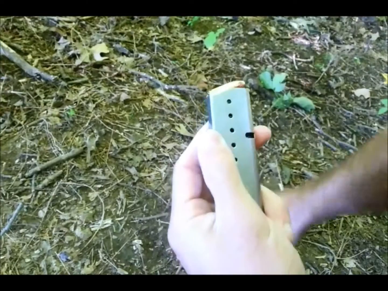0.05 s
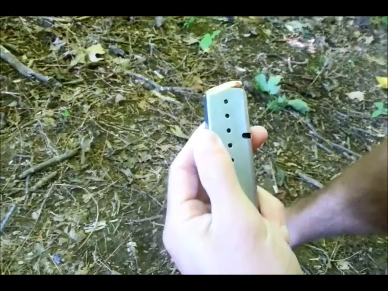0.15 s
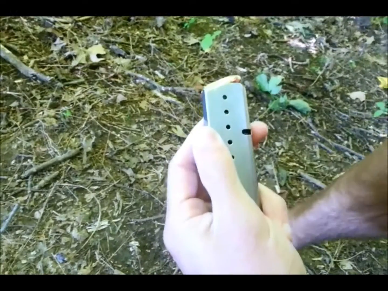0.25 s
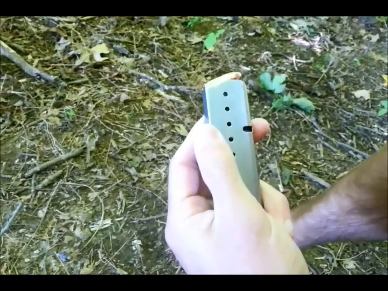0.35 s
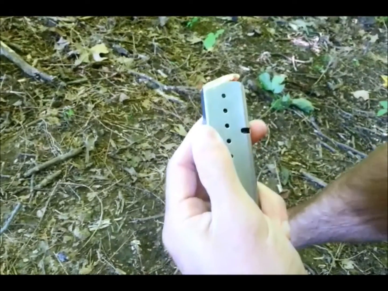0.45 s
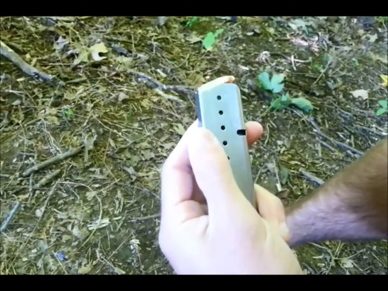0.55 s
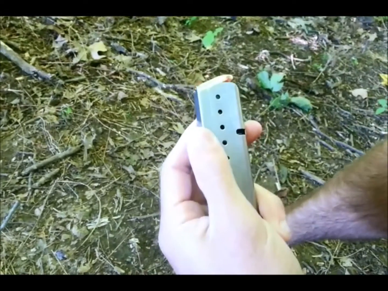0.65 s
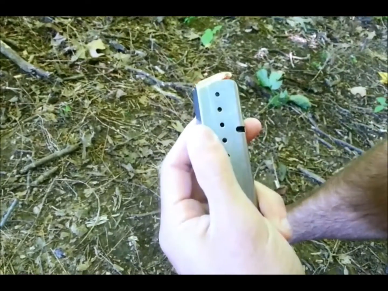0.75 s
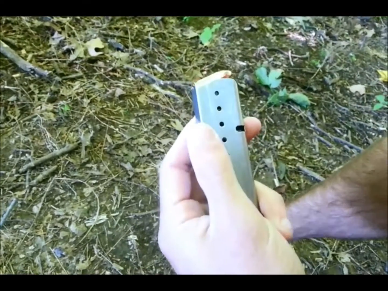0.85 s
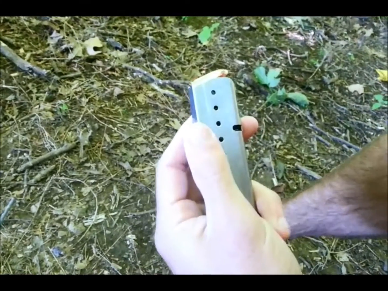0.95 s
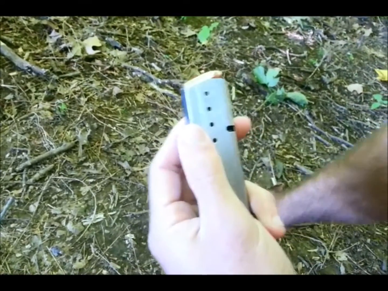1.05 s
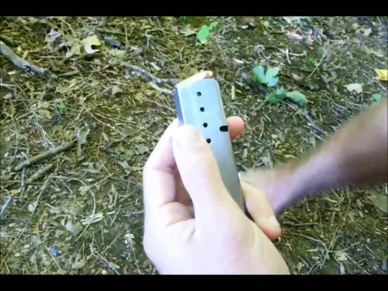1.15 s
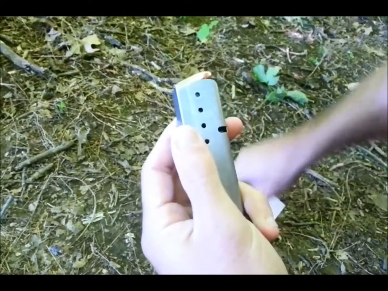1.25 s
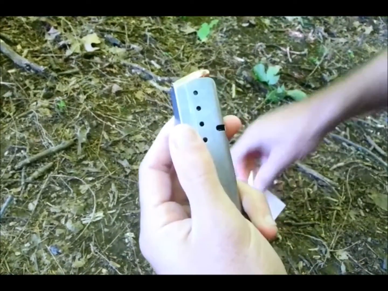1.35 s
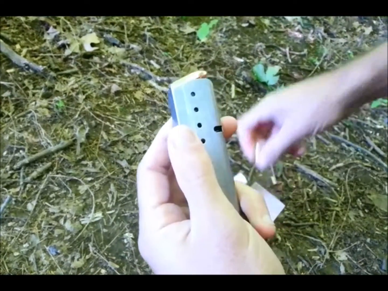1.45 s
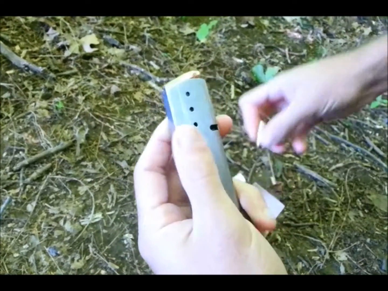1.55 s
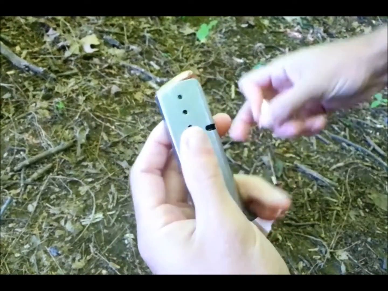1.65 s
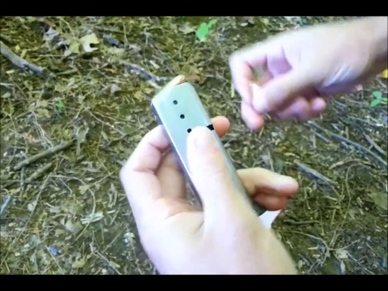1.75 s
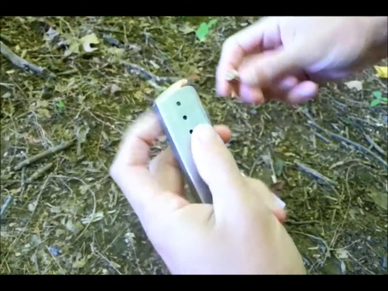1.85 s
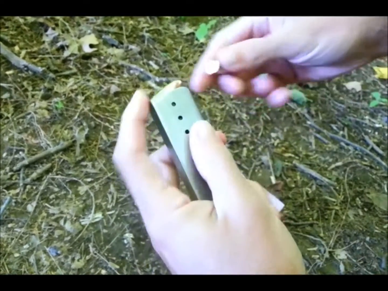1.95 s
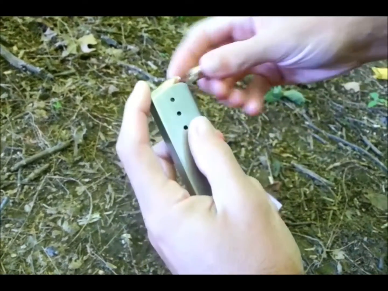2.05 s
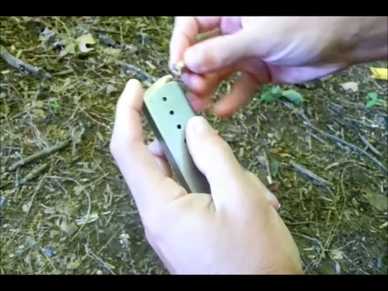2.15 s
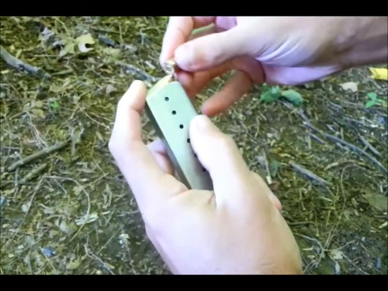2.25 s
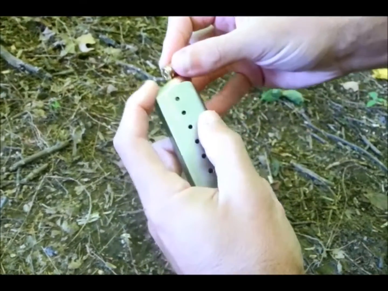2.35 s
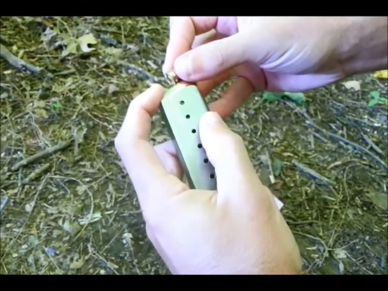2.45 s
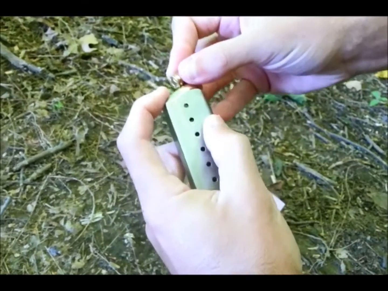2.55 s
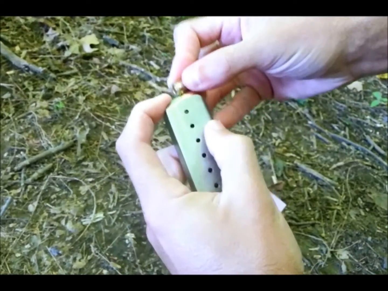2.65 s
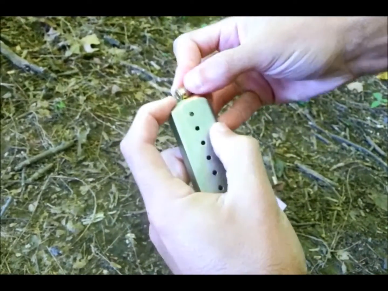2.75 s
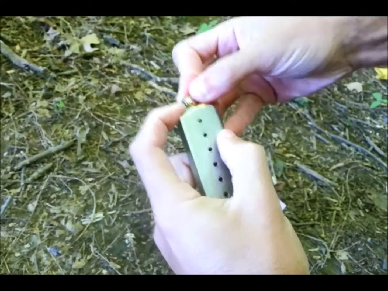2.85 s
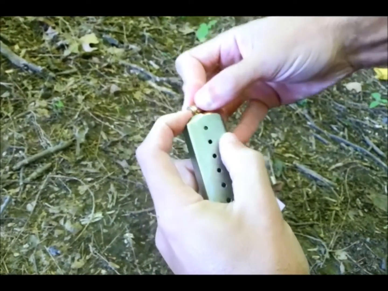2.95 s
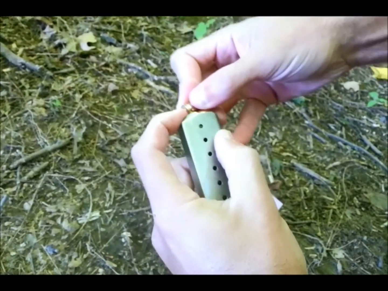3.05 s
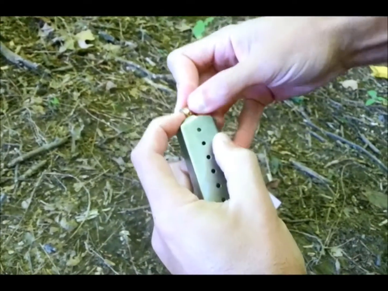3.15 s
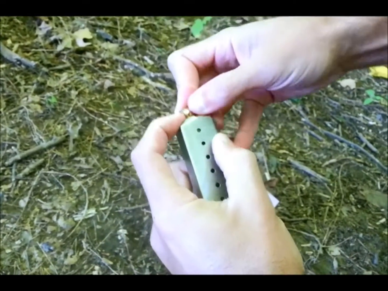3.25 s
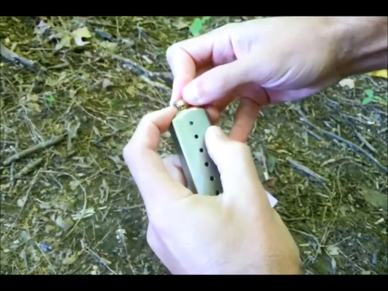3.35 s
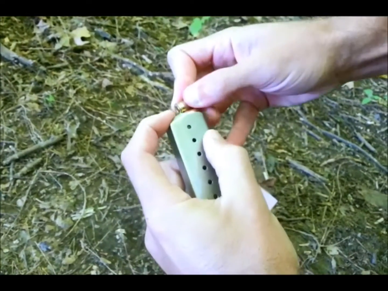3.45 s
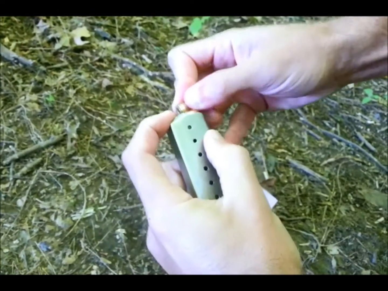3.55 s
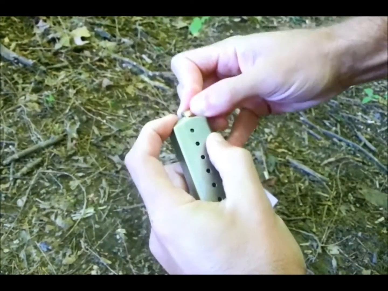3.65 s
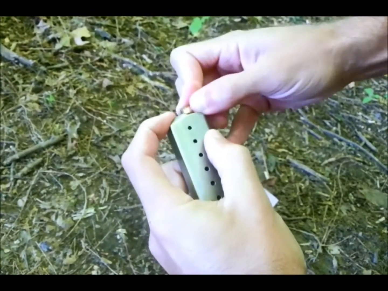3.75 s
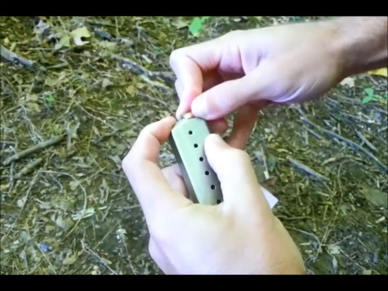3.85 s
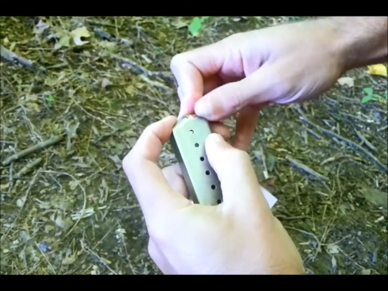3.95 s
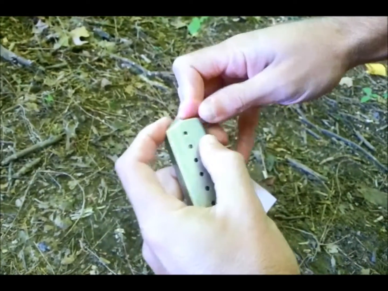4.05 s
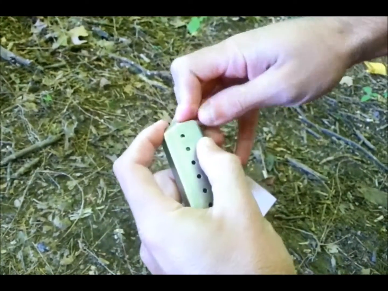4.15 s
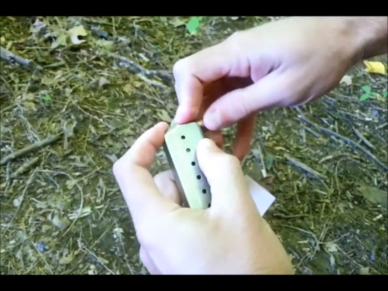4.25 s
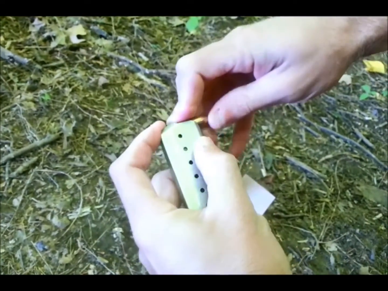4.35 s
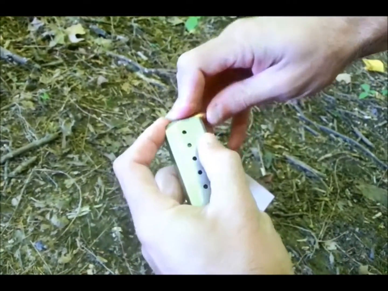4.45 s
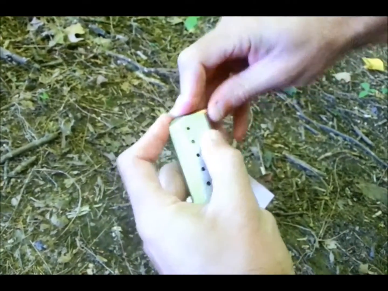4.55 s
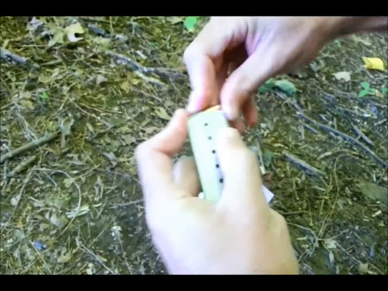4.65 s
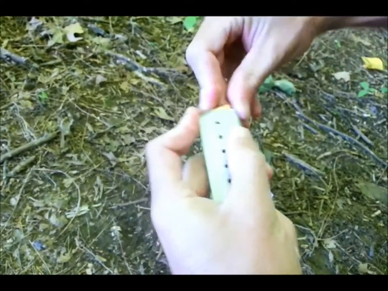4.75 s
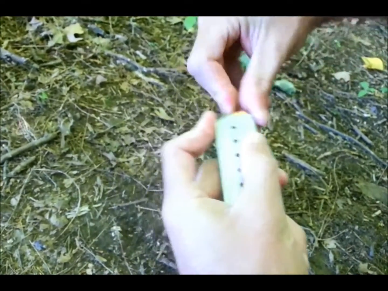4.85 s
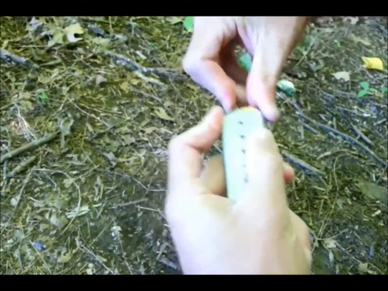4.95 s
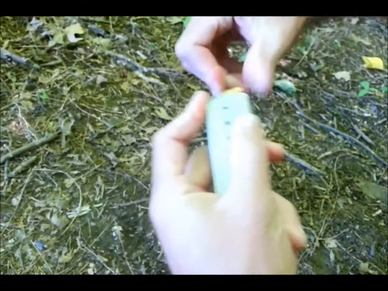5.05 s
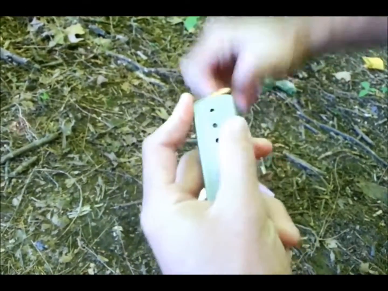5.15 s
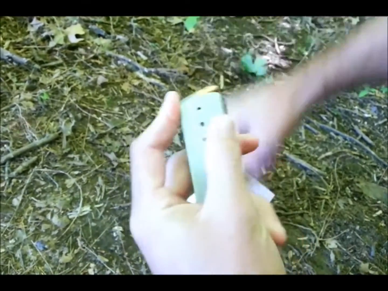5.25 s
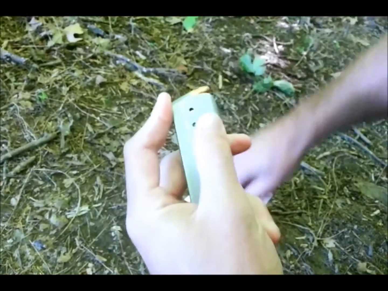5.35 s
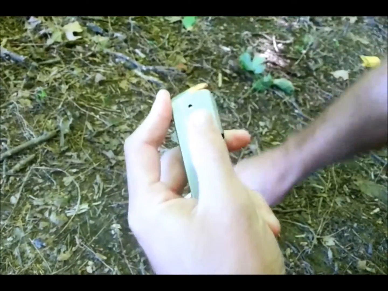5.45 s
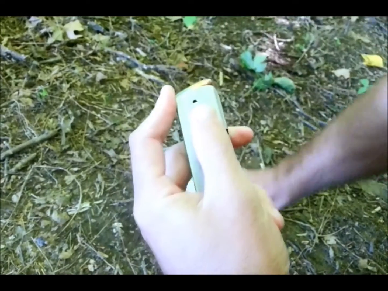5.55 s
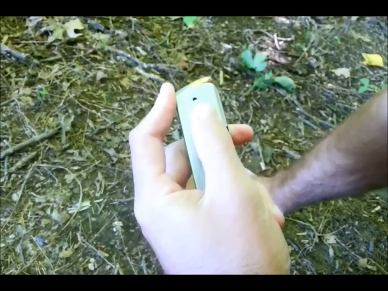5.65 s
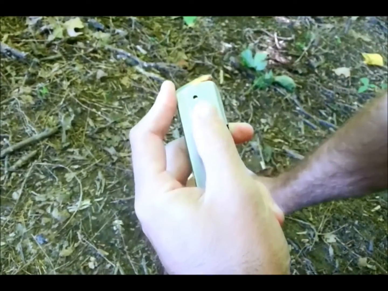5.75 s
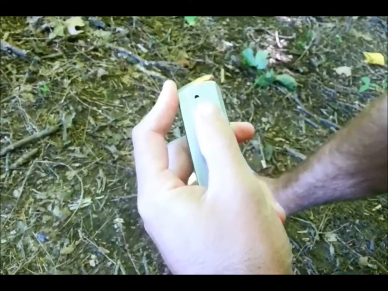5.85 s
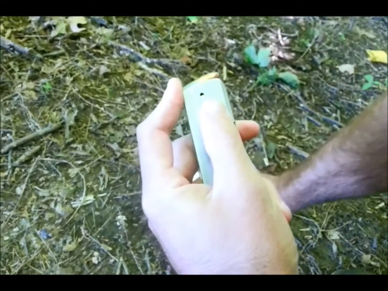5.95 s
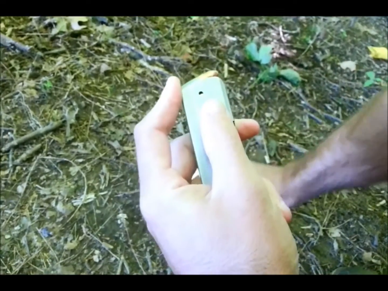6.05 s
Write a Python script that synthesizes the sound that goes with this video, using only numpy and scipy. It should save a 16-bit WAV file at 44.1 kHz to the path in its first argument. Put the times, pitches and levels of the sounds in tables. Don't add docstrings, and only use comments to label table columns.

```python
import sys
import numpy as np
from scipy import signal
from scipy.fft import rfft, irfft, next_fast_len
from scipy.io import wavfile
from scipy.ndimage import uniform_filter1d, map_coordinates

SR = 44100
rng = np.random.default_rng(int(sys.argv[2]) if len(sys.argv) > 2 else 0)


def inscribe(sig):
    pcm = np.round(np.clip(np.atleast_2d(sig).T, -1, 1) * 32767)
    wavfile.write(sys.argv[1], SR, pcm.astype(np.int16))


def volts_from_decibels(level):
    exponent = np.asarray(level, float) / 20
    return 10 ** exponent


N = 269010


def along(points, hz):
    f, v = np.transpose(points)
    return np.interp(np.log(hz + 1), np.log(f + 1), v, left=v[0], right=v[-1])


def unit(x):
    return x / np.sqrt(np.mean(x ** 2) + 1e-20)


def wobble(rate):
    knots = rng.standard_normal(int(N * rate / SR) + 4)
    return map_coordinates(knots, [np.arange(N) * rate / SR], order=1)


def filtered(x, response):
    m = next_fast_len(N + 8192)
    return irfft(rfft(x, m) * response(np.fft.rfftfreq(m, 1 / SR)), m)[..., :N]


def pair(alike):
    a, b = rng.standard_normal((2, N))
    turn = np.arccos(np.clip(alike, -1, 1)) / 2
    return np.array([np.cos(turn) * a + np.sin(turn) * b, np.cos(turn) * a - np.sin(turn) * b])


def rush(spectrum, alike, patchy_db):
    z = signal.stft(np.pad(pair(alike), ((0, 0), (0, 512))), nperseg=512)[2]
    field = uniform_filter1d(rng.standard_normal(z.shape[1:]), 6, 0)
    field = uniform_filter1d(field, 10, 1)
    patchy = signal.istft(z * volts_from_decibels(patchy_db * unit(field)), nperseg=512)[1][:, :N]
    return unit(filtered(patchy, lambda hz: volts_from_decibels(along(spectrum, hz))))


def resonant(x, modes, lag, left_db):
    def body(f):
        total = 0
        for k, (center, width, db) in enumerate(modes):
            mode = 1j * f * width / (center * center - f * f + 1j * f * width)
            total = total + (-1) ** k * volts_from_decibels(db) * mode
        return total

    def ports(f):
        delay = np.exp(-1j * np.pi * f * lag / SR * np.array([[1], [-1]]))
        return delay * volts_from_decibels([[left_db / 2], [-left_db / 2]])

    gain = np.sqrt(np.mean(np.abs(body(np.linspace(0, SR / 2, 4000))) ** 2))
    return filtered(x, lambda f: body(f) * ports(f) / gain)


def bursts(times, db, t60, rise, hz=None):
    t = np.arange(SR // 16) / SR
    decay = volts_from_decibels(db[:, None] - 60 * t / np.clip(t60, .003, .07)[:, None])
    shape = decay * (1 - np.exp(-t / rise))
    if hz is not None:
        shape = shape * np.sin(2 * np.pi * hz[:, None] * t)
    at = np.round(times * SR).astype(int)[:, None] + np.arange(len(t))
    return np.bincount(at.ravel(), shape.ravel(), N + SR)[:N]


def grains(count, spread_db, t60):
    when, size = rng.random((count, 2)).T
    hits = np.bincount((when * N).astype(int), volts_from_decibels(-spread_db * np.log(size + 0.0059)), N)
    return unit(signal.lfilter([1], [1, -volts_from_decibels(-60 / (t60 * SR))], hits) + .2)


def strokes(rows, rise, fall):
    t = np.arange(N) / SR
    gain = 0
    for s, hold, db in rows:
        gain = gain + volts_from_decibels(db - rise * np.clip(s - t, 0, 1) - fall * np.clip(t - s - hold, 0, 1))
    return gain


# (pitch_hz, level_db per Hz)
RUMBLE_COLOUR = [(15, -55), (30, -35), (66, -13), (120, -5), (250, -2), (500, -5), (900, -8.5), (1500, -14),
                 (2200, -26), (3500, -120)]


def far_rumble():
    return volts_from_decibels(-58 + 0.33 * wobble(3.48)) * rush(RUMBLE_COLOUR, alike=0.13, patchy_db=-0.4)


# (time_s, level_db)
BREEZE = [(0, -53), (1.2, -53.5), (1.6, -56.5), (2.2, -56), (3.6, -53.5), (4.4, -52.5), (5.1, -51.5),
          (5.5, -50.5), (6.1, -49)]
# (pitch_hz, level_db per Hz)
LEAF_COLOUR = [(710, -14), (1200, -13), (1440, -8.5), (1570, -12.5), (2420, -4), (2800, -2.5), (3630, 1.5),
               (4580, -1), (5610, -8), (7130, -12), (12000, -27), (15600, -51), (22000, -120)]


def leaves():
    breeze = volts_from_decibels(np.interp(np.arange(N) / SR, *np.transpose(BREEZE), right=-120))
    flutter = volts_from_decibels(3.0 + 0.31 * wobble(4.9))
    return breeze * flutter * rush(LEAF_COLOUR, alike=-0.061, patchy_db=1.24) * volts_from_decibels([[-1.5], [1.5]])


# (start_s, length_s, from_hz, to_hz, level_db)
BIRD_LISPS = [
    (2.72, 0.09, 8100, 7900, -66),
    (5.14, .09, 8700, 8400, -70),
    (5.248, .09, 8000, 8050, -61),
    (5.353, 0.076, 7060, 7140, -59),
    (5.418, .06, 6000, 5800, -59),
]


def far_bird():
    bird, blur_hz = np.zeros(N), 220 * wobble(302)
    for s, length, from_hz, to_hz, db in BIRD_LISPS:
        u = np.linspace(0, 1, round(length * SR))
        hz = from_hz + (to_hz - from_hz) * u + blur_hz[:len(u)]
        lisp = np.sin(np.pi * u) * np.sin(2 * np.pi * np.cumsum(hz) / SR)
        bird[round(s * SR):][:len(u)] += volts_from_decibels(db) * lisp
    return bird * volts_from_decibels(4 * wobble(120))


# (pitch_hz, t60_s)
TREE_DECAY = [(500, 0.17), (3000, 0.53), (4500, 0.25), (7000, 0.34), (12000, 0.34)]
# (pitch_hz, level_db)
ECHO_COLOUR = [(800, -30), (2000, -17), (2800, -5), (3300, 1.5), (4200, 2.5), (5200, -2), (6500, -12),
               (10000, -14.5), (14000, -20)]


def trees(near):
    blows = np.abs(near) * rng.standard_normal(N)
    hz, t, z = signal.stft(rng.standard_normal((2, SR // 2)), SR, nperseg=256)
    fade = volts_from_decibels(-60 * t / along(TREE_DECAY, hz)[:, None])
    swell = 1 - np.exp(-t / 0.01)
    trunks = volts_from_decibels(5 * np.exp(-((t + .011 - .042) / .008) ** 2))
    tail = signal.istft(z * fade * swell * trunks, SR, nperseg=256)[1]
    delayed = np.pad(blows.sum(0), (500, 0))[None]
    echo = signal.fftconvolve(delayed, tail / np.linalg.norm(tail[0]), axes=1)[:, :N]
    return volts_from_decibels(-27.5) * filtered(echo, lambda hz: volts_from_decibels(along(ECHO_COLOUR, hz)))


# (start_s, level_db, t60_s,
# pitch_hz)
DULL_BUMPS = [(.06, -43.5, 0.061, 227), (0.061, -33, .03, 1040), (1.206, -44, .04, 226),
              (1.221, -30.5, 0.025, 250), (1.215, -43, .04, 620), (1.335, -43, 0.045, 1045),
              (3.985, -40, 0.079, 1550), (5.647, -39.5, 0.036, 239), (2.335, -43, 0.042, 1660),
              (2.898, -36, .02, 1550), (4.095, -40, .03, 1400), (4.107, -40, .03, 1900),
              (5.5, -42, .02, 1700), (3.712, -35, .023, 470), (3.714, -23, 0.017, 935)]


def dull_bumps():
    s, db, t60, hz = np.transpose(DULL_BUMPS)
    return bursts(s, db, t60, rise=0.0032, hz=hz) * volts_from_decibels([[1.5], [-1.5]])


# (pitch_hz, width_hz, level_db)
FREE_BRASS = [(6310, 2130, -1), (7450, 1020, -0.5), (8700, 1060, -6), (10320, 890, -3), (13900, 6900, -10)]
# (pitch_hz, width_hz, level_db)
TRAY_PLASTIC = [(1390, 650, -10), (2096, 490, -1), (2870, 670, -0.5), (3550, 890, -1.5), (4380, 744, -2.5)]
# (pitch_hz, width_hz, level_db)
TRAY_HOLLOW = [(1114, 152, 2.5), (563, 110, -7), (296, 130, -12.5)]
# (pitch_hz, width_hz, level_db)
PACKED_BRASS = [(5300, 910, 1), (6670, 720, 1.5), (8400, 1200, -4), (10230, 660, -20)]
# (start_s, level_db, brightness_db, pitch_hz)
KNOCKS = [(.0621, -26.5, -9, 2300), (.221, -21.5, -4, 2460), (.2416, -21.5, -9, 3420),
          (.2857, -20.5, -10, 1810), (.3576, -35, -6, 2010), (.4878, -24, -16, 3950),
          (.6448, -11.5, -8.5, 4540), (.6932, -22.5, -27, 3120), (.884, -24.5, -20, 1950),
          (.9001, -22.5, -34, 2540), (.9366, -19.5, -7.5, 2090), (1.0515, -16.5, -6.5, 2360),
          (5.646, -33, -18, 2350), (5.7012, -30.5, -18, 2770), (5.7247, -34, -13, 2600),
          (5.802, -29, -5, 2430), (5.8333, -31.5, 0, 3400), (5.8783, -32, -22, 3260),
          (5.9178, -35, -19, 2110), (6.092, -30, 3.5, 2500)]
# (start_s, level_db, brightness_db, pitch_hz)
TICKS = [(.1935, -23, -9, 3920), (.1997, -18.5, -22, 4200), (.2087, -18, -3.5, 4400),
         (.4052, -27, -12, 2230), (.4303, -20.5, -18, 2480), (.5453, -18.5, -21, 2500),
         (.5895, -15.5, -26, 2440), (.6021, -21.5, -12, 2135), (.6241, -28, -20, 3040),
         (.6415, -17.5, -22, 2300), (.7254, -33, -28, 4390), (.7854, -25, -37, 2030),
         (1.012, -13, -4.5, 4080), (1.0421, -12.5, -7, 4680), (1.0629, -19, -9, 1950),
         (1.0768, -21.5, -7.5, 2940), (1.1766, -16.5, -9, 3370), (1.197, -39, -12, 2400),
         (.9733, -38, -9, 4520), (5.7571, -13, -13.5, 2710), (5.782, -22, -14, 2500),
         (5.845, -29, -8, 2960), (5.8524, -15.5, -10.5, 2950), (5.9654, -23, -10, 2620),
         (6.0062, -20.5, -28, 4320), (6.013, -21, -24, 4280), (6.0248, -26, -10, 4650)]
# (start_s, level_db, brightness_db, pitch_hz)
DRAGS = [(.2314, -18.5, -9, 1960), (.2707, -22.5, -11, 3350), (.2965, -27, -19, 3440),
         (.3708, -42, -22, 2000), (.4178, -27.5, -20, 1960), (.4584, -24, -19, 2440),
         (.4635, -19.5, -11.5, 2326), (.4742, -12, -12, 4445), (.5127, -26, -26, 4380),
         (.5325, -24.5, -25, 2500), (.5556, -27, -28, 2190), (.6809, -27, -22, 4270),
         (.912, -35, -26, 2440), (1.0007, -28.5, -26, 2230), (1.0271, -18, -9.5, 2160),
         (1.1262, -38.5, -7, 2070), (1.3444, -39.5, -3, 4600), (5.6592, -28, -6.5, 3390),
         (5.7895, -17, -9, 3370), (6.0853, -21, -0.5, 2260)]
# (start_s, hold_s, level_db)
STIRS = [(.205, 0.049, -34.5), (.3, 0.16, -43.5), (.46, 0.042, -34), (.55, .1, -43), (.69, 0.081, -49),
         (.78, .08, -51.5), (.9, 0.054, -44), (1.01, 0.053, -35), (1.12, 0.23, -54), (5.655, 0.086, -41.5),
         (5.785, .035, -35.5), (5.85, 0.092, -48), (5.98, 0.063, -45), (6.085, .03, -34)]


def tray():
    kinds = [(KNOCKS, -9, .026), (TICKS, -29.5, 0.027), (DRAGS, -12, .052)]  # (contacts, thud dB, t60 s)
    contacts = [(*row, thud, t60) for rows, thud, t60 in kinds for row in rows]
    s, db, bright, hz, thud, t60 = np.transpose(contacts)
    thud = thud + 4 * rng.standard_normal(len(s))
    rattle = strokes(STIRS, rise=990, fall=394) * grains(count=3600, spread_db=1.5, t60=0.0067)

    shake = bursts(s, db - 6, 0.89 * t60, rise=0.00043) + rattle
    shell = resonant(shake * pair(0.35), TRAY_PLASTIC, lag=-0.73, left_db=-4.0)
    push = bursts(s, db + thud - 4.0, 0.85 * t60, rise=0.001) + volts_from_decibels(-9) * rattle
    cavity = resonant(push * pair(0.71), TRAY_HOLLOW, lag=-1.4, left_db=0.5)
    hit = bursts(s, db + 2.16 * bright + 9, 0.022 * t60, rise=.0001)
    crack = resonant(hit * pair(.3), FREE_BRASS, lag=-1.27, left_db=0.5)
    jostle = bursts(s, db + bright, .5 * t60, rise=0.0011) + volts_from_decibels(-13) * rattle
    packed = resonant(jostle * pair(0.28), PACKED_BRASS, lag=-0.57, left_db=-5.5)

    ring = bursts(s, db - 3, 0.86 * t60, rise=0.0002, hz=hz)
    other_hz = 1900 * 2.8 ** rng.random((len(s), 2))
    others = np.array([bursts(s, db - 5.0, 0.48 * t60, rise=0.00039, hz=f) for f in other_hz.T])
    return shell + cavity + crack + packed + (ring + others) * volts_from_decibels([[-1.8], [1.8]])


# (pitch_hz, width_hz, level_db)
STEEL_SHELL = [(1550, 86, -14.5), (3150, 354, 2.5), (3680, 190, 1.5), (4020, 284, -1.5), (4750, 210, -2.5),
               (5380, 260, -12.5)]


def magazine_side(rows, slide, lag, shell_db):
    s, db, bright, t60, hz = np.transpose(rows)
    shake = bursts(s, db + shell_db + 4.0, 0.35 * t60, rise=0.00024) + slide
    shell = resonant(shake * pair(0.49), STEEL_SHELL, lag, left_db=-2.5)
    tick = bursts(s, db + bright, 0.54 * t60, rise=0.00017) + volts_from_decibels(-18.5) * slide
    case = resonant(tick * pair(0.35), FREE_BRASS, lag, left_db=-7.0)
    ring = [bursts(s + side * lag / SR / 2, db - 2.0 * side, 0.83 * t60, rise=0.0007, hz=hz)
            for side in (1, -1)]
    return shell + case + ring


# (start_s, level_db, brightness_db, t60_s)
LIP_TOUCHES = [(2.3407, -21, -32, .022), (2.3444, -25, -27, 0.023), (2.349, -33, -30, .03),
               (2.357, -30.5, -40, .05), (2.365, -29, -29, 0.023), (2.39, -34, -25, .03),
               (2.397, -35, -20, .018), (3.9055, -39, -14, .043), (3.973, -42, -5, 0.021),
               (3.981, -28, -17, 0.037), (3.9878, -16.5, -23, .024), (4.0422, -29.5, -36, 0.014),
               (4.0563, -41, -27, .017), (4.0643, -36, -27, .016), (4.0953, -32, -1.5, 0.038),
               (4.1078, -25, -12, 0.033), (4.2255, -34, -12.5, 0.061), (4.49, -42, -12, .052),
               (4.6418, -34, -11, .034), (5.129, -22, -23, 0.022)]
# (start_s, level_db, brightness_db, t60_s, pitch_hz)
CLINKS = [(2.3343, -18, -16.5, 0.013, 4000), (2.336, -18, -28, 0.014, 6100), (2.3356, -28, -33, .018, 3380),
          (2.7554, -30.5, -26, 0.028, 3360), (2.899, -25, -25, 0.032, 3530), (4.0102, -27, -9, .015, 7000),
          (4.0119, -24, 1, 0.018, 3600), (4.0439, -25.5, -34, 0.039, 3150),
          (4.627, -26, -10.5, 0.019, 4230), (5.117, -21.5, -31, 0.017, 4230),
          (5.118, -19, -30, 0.012, 3700), (5.1278, -21.5, -25, 0.017, 4400)]
# (start_s, level_db, brightness_db, t60_s, pitch_hz)
SNAP = [(3.7095, -35, 1, .046, 3280), (3.7126, 3, -5, 0.032, 3313), (3.7131, -1, -13, .035, 4843),
        (3.7136, -3.5, -20, 0.043, 4144), (3.7158, 0.5, -10.5, 0.046, 3065),
        (3.717, -4.5, -28, 0.036, 3790), (3.721, -12, -17, 0.041, 3330), (3.731, -24, -31, .02, 3200)]
# (start_s, hold_s, level_db)
SLIDES = [(2.337, 0.048, -44.5), (3.985, 0.0072, -30), (4.02, 0.12, -45), (4.48, 0.018, -56),
          (5.125, 0.011, -45)]


def magazine():
    turn_s = 4.55
    slide = strokes(SLIDES, rise=1100, fall=560) * grains(count=2500, spread_db=2.0, t60=0.019)
    lips = [(*row, 3243 * (1 + 0.049 * rng.standard_normal())) for row in LIP_TOUCHES]
    touches = lips + list(CLINKS) + list(SNAP)
    early = np.arange(N) < turn_s * SR
    before = magazine_side([r for r in touches if r[0] < turn_s], slide * early, lag=5.18, shell_db=-1.5)
    after = magazine_side([r for r in touches if r[0] > turn_s], slide * ~early, lag=2.3, shell_db=-10.5)
    return filtered(before + after, lambda f: 0.35 + 0.63 / (1 + (2500 / (f + 1)) ** 8))


def scene():
    woods = leaves() + far_rumble() + far_bird()
    near = tray() + magazine()
    return woods + trees(near) + dull_bumps() + near


def starved(x, edge_hz, below_db):
    hz, _, z = signal.stft(x, SR, nperseg=2048)
    power = np.abs(z) ** 2
    band = power[:, :1024].reshape(2, 128, 8, -1).mean(2)
    band = np.repeat(band, 8, 1)
    quiet = band < power.mean(1, keepdims=True) * volts_from_decibels(-2 * below_db)
    z[:, :1024] *= ~(quiet & (hz[:1024, None] > edge_hz))
    return signal.istft(z, SR, nperseg=2048)[1][:, :N]


def band_limit(x):
    return signal.sosfilt(signal.butter(12, 15560, fs=SR, output="sos"), x)


# (pitch_hz, level_db per Hz)
PREAMP_HISS = [(400, -40), (1500, 0), (8000, -7), (11000, -6.5), (14300, -4.5), (14900, -34)]


def record(dry):
    x = dry + volts_from_decibels(-60.5) * rush(PREAMP_HISS, alike=0, patchy_db=1.2)
    x = x / (1 + np.abs(x / 1.02) ** 12) ** (1 / 12)
    x = filtered(x, lambda hz: 1 / (1 + (hz / 14900) ** 30))
    x = starved(x, edge_hz=9000, below_db=18)
    return band_limit(np.clip(x, -1, 1))


dry = scene()
out = record(dry)
inscribe(out)
```